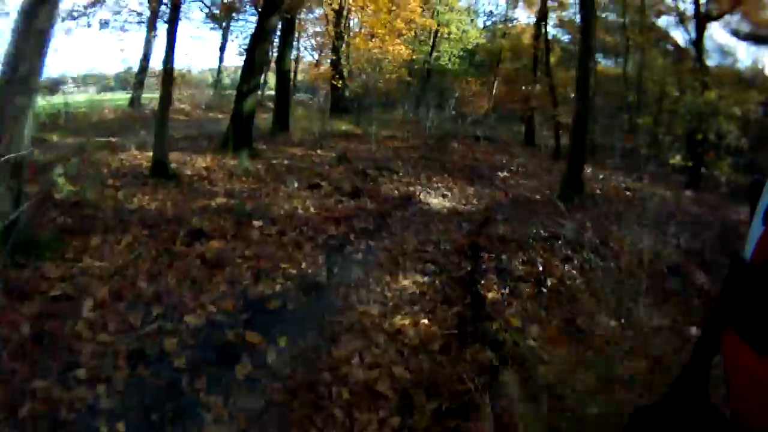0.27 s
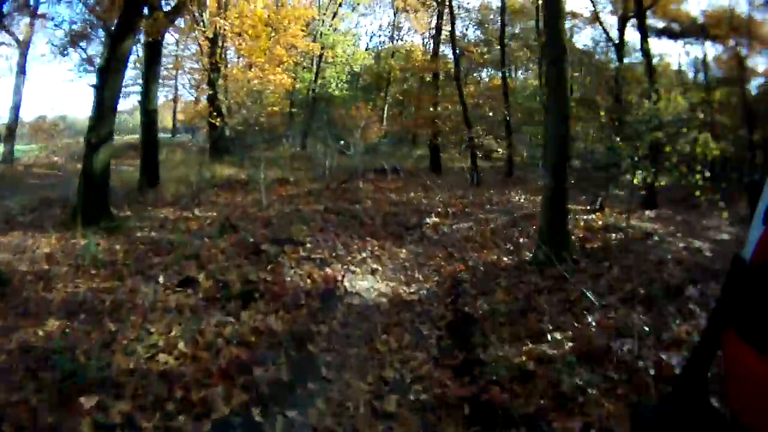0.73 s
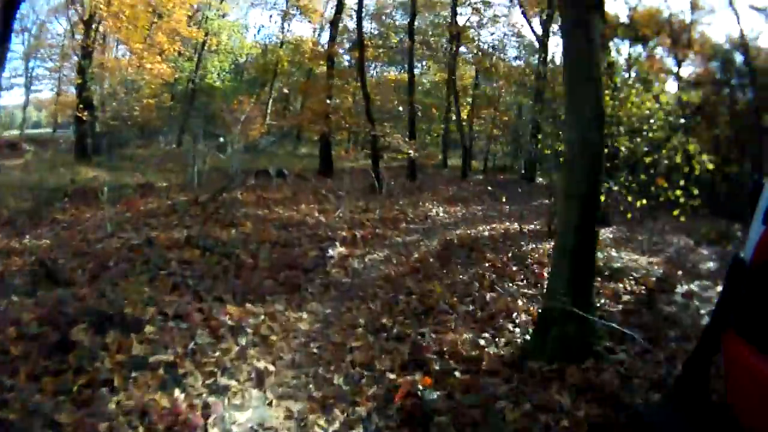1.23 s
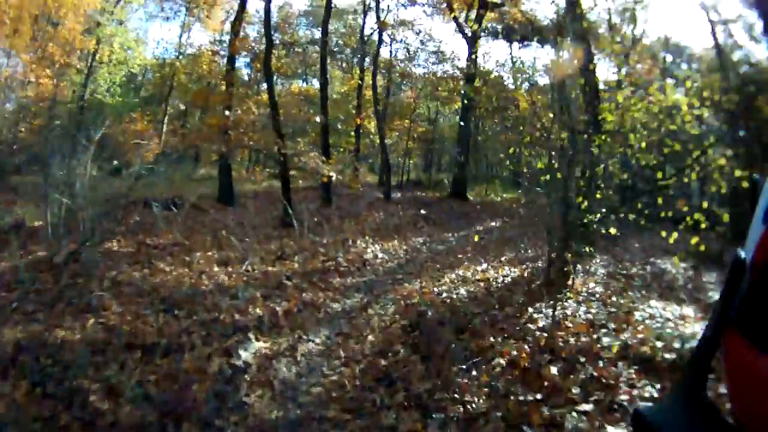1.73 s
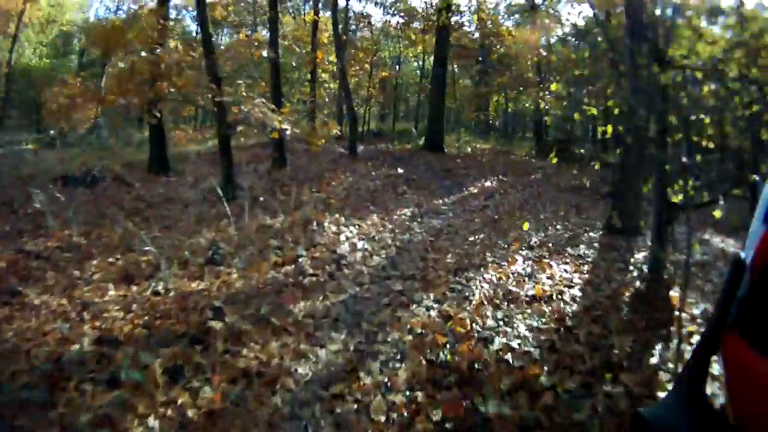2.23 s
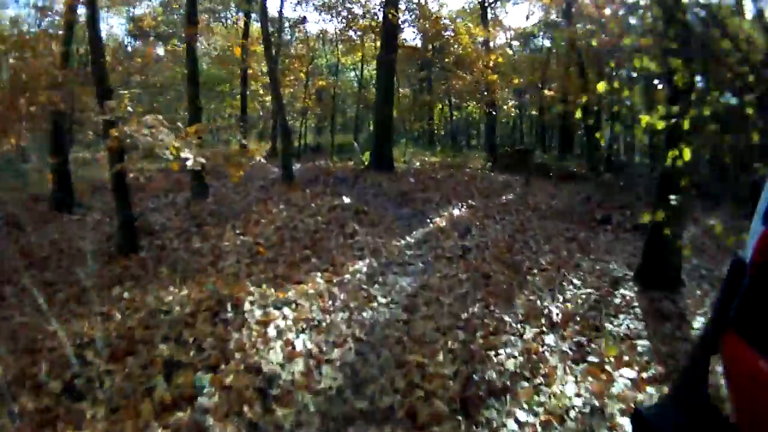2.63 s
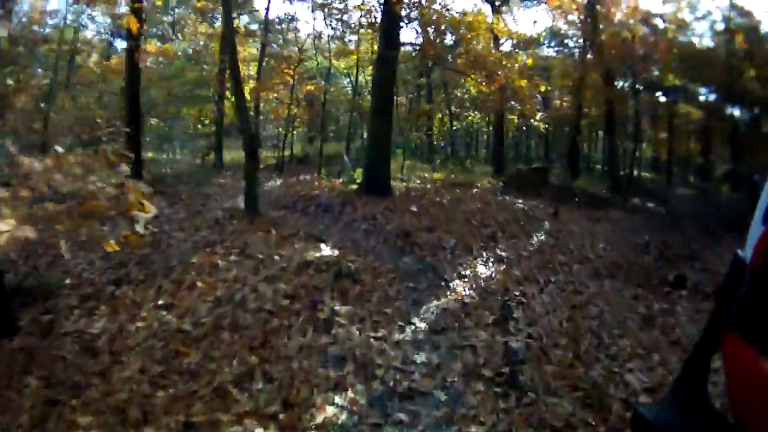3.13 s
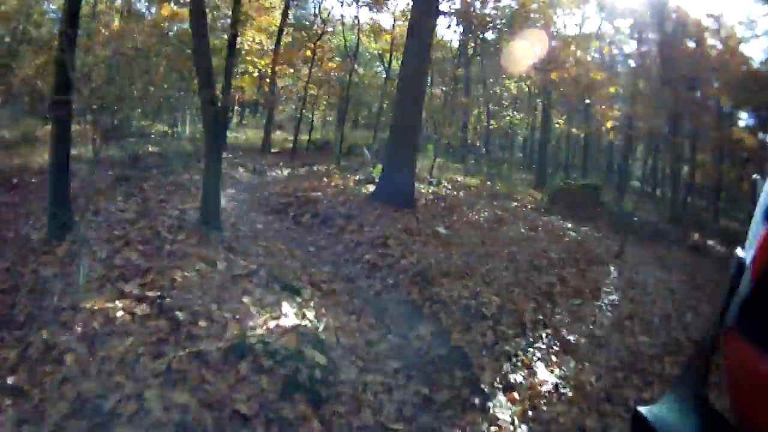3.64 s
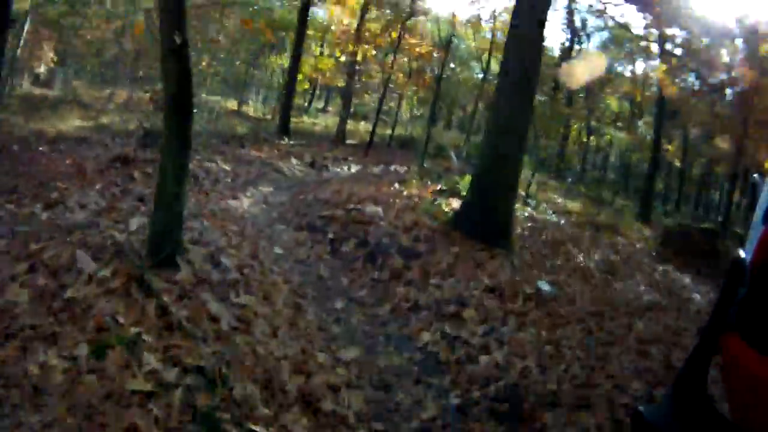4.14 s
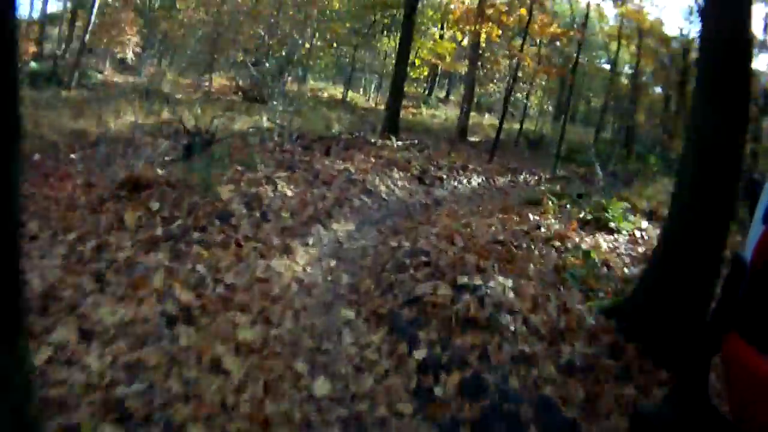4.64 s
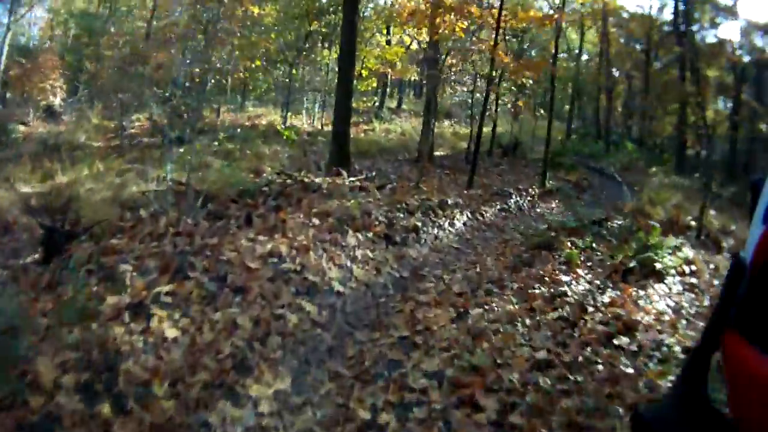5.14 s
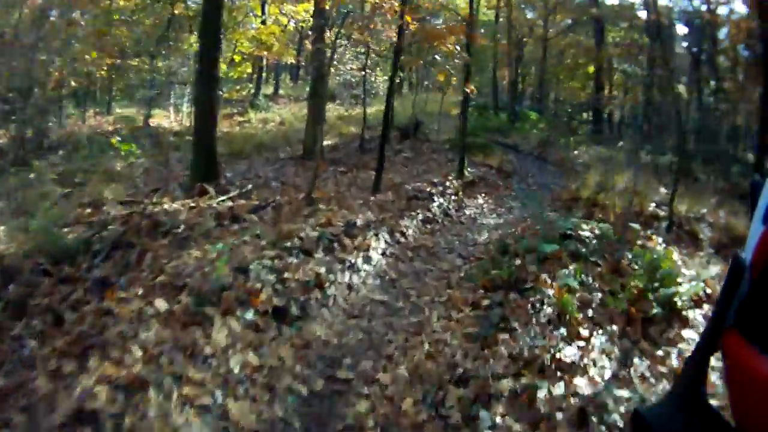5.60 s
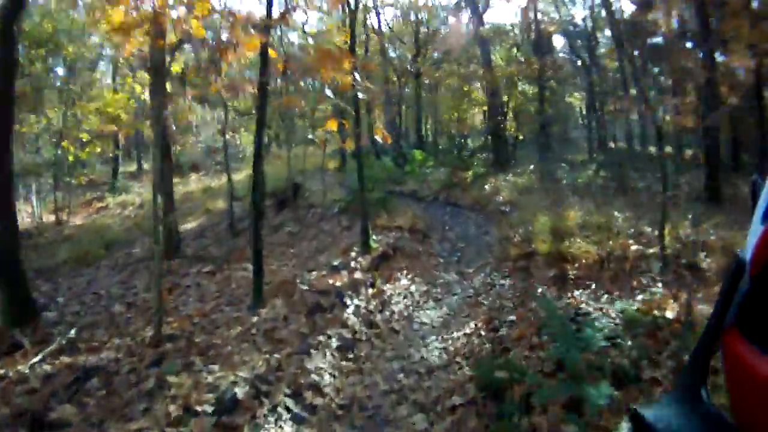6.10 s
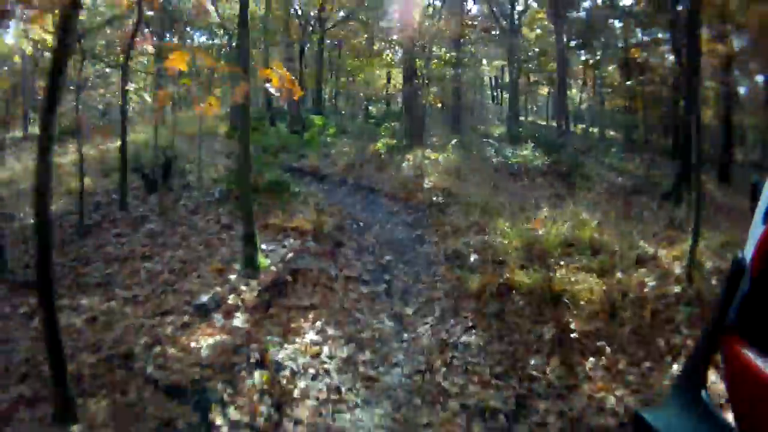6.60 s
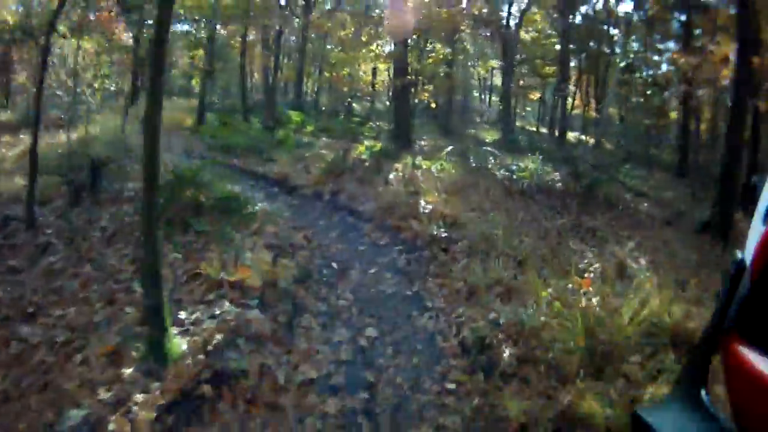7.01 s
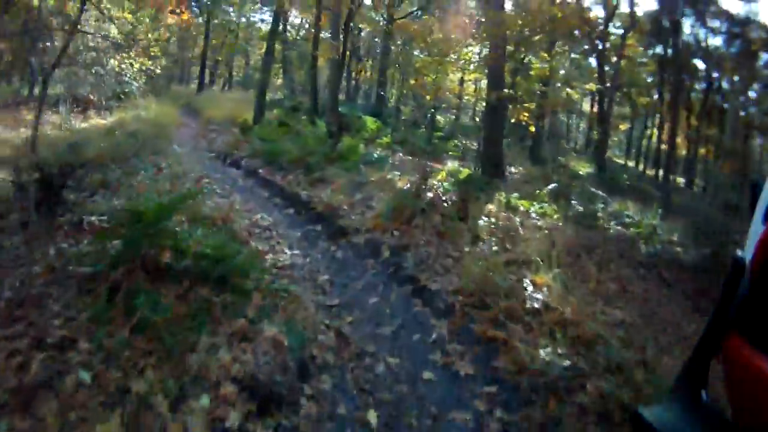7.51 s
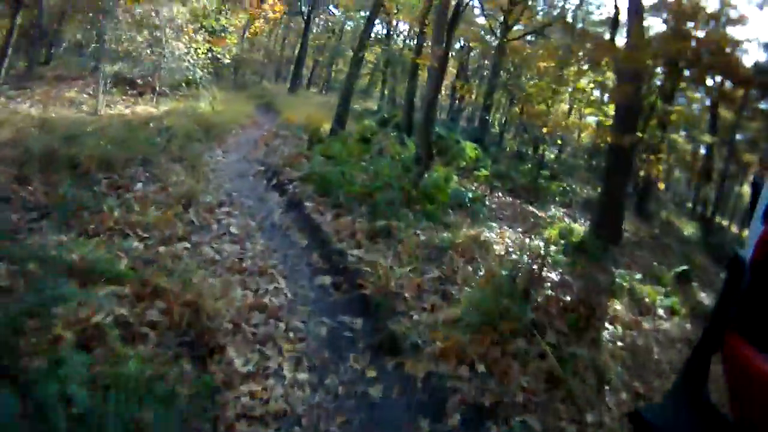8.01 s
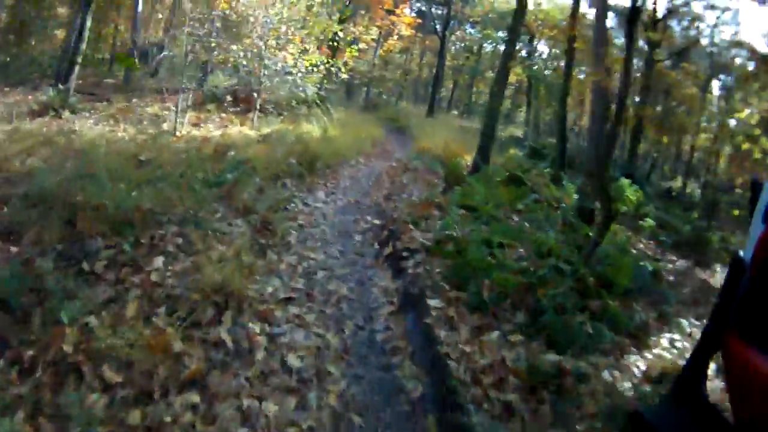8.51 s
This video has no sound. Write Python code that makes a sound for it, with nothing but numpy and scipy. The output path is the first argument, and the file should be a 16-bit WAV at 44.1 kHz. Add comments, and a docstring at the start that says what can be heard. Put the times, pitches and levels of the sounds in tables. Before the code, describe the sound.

For almost nine seconds a bicycle rolls along a leafy woodland trail, heard through a small camera's closed plastic case. A dull, fluttering tyre roar and low gusty wind run throughout, with faint hiss and a barely audible thin whine. At first leaves crackle brightly in quick bursts with tiny grit ticks; a blunt thump comes at about 1.1 s and a deeper one at 1.8 s. From 2.3 to 3.3 s crunching thickens, with several bumps and ticks. Leaf bursts cluster between 3.7 and 4.6 s, with a hard, dry stone knock at 4.2 s. Crisp rustle follows around 5 s. From 6 to 7.2 s the rumble is fuller, the crunch duller, with repeated thumps and a sharp tick at 7.0 s. A second stone knock hits at 7.7 s; leaves thin, bumps continue to 8.3 s, and a bright tick lands at 8.7 s.

```python
"""Bicycle on a leafy trail

A bicycle rolls over dry leaves in a wood, heard from a small camera shut in a plastic case.
Wind and tyre roar are coloured noise, a dull rumble with low thumps from roots and ruts.
Leaves are crowds of tiny random cracks and grit gives single ticks; both ring the plastic case.
Two hard stone knocks ring the lid of the case, and the camera adds its own hiss and a faint whine."""
import sys
import numpy as np
from scipy import signal
from scipy.fft import rfft, irfft, next_fast_len
from scipy.io import wavfile
from scipy.ndimage import map_coordinates

SR = 44100
rng = np.random.default_rng(int(sys.argv[2]) if len(sys.argv) > 2 else 0)


def wav_record(signal):
    """Record a signal, one row per channel, as 16-bit PCM in the file named by sys.argv[1]."""
    frames = np.transpose(np.atleast_2d(signal))
    bounded = np.clip(frames, -1, 1)
    # unit amplitude maps onto the largest positive 16-bit level
    quanta = np.round(bounded * 32767).astype(np.int16)
    wavfile.write(sys.argv[1], SR, quanta)


def boost_factor(decibels):
    """Convert a level in decibels to a linear amplitude factor."""
    exponent = np.asarray(decibels, float) / 20
    return 10 ** exponent


N = 385875  # length in samples


def unit(x):
    """Scale to rms 1."""
    return x / np.sqrt(np.mean(x ** 2) + 1e-20)


def curves(rows):
    """Join the table's points by straight lines: one curve for each column after the time."""
    times, *columns = np.transpose(rows)
    return [np.interp(np.arange(N) / SR, times, column) for column in columns]


def wobble(rate):
    """A smooth random curve around zero, with rate knots a second."""
    knots = rng.standard_normal(N // 100)
    return map_coordinates(knots, [np.arange(N) * rate / SR])


def filtered(x, response):
    """Shape x by a response, possibly complex, given as a function of frequency."""
    size = next_fast_len(len(x) + 8192)  # spare room lets the ringing die away
    hz = np.fft.rfftfreq(size, 1 / SR)
    return irfft(rfft(x, size) * response(hz), size)[:len(x)]


def noise(spectrum):
    """Noise of rms 1, coloured by table points joined on a log frequency axis."""
    f, db = np.transpose(spectrum)
    colour = lambda hz: boost_factor(np.interp(np.log(hz + 1), np.log(f), db))
    return unit(filtered(rng.standard_normal(N), colour))


def mode(hz, centre_hz, width_hz):
    """The causal response of one resonance: strongest at its centre, longer ringing if narrow."""
    return 1j * hz * width_hz / (centre_hz ** 2 - hz ** 2 + 1j * hz * width_hz)


def add_event(out, s, db, sound):
    """Add a short sound at s seconds, scaled so that its peak is db."""
    out[round(s * SR):][:len(sound)] += boost_factor(db) * sound / np.abs(sound).max()


# wind and tyre through the ride: (t/s, wind level/dB, tyre level/dB)
RIDE_LEVELS = [(0.0, -53, -45.5), (0.05, -44, -46), (0.12, -62, -50), (0.15, -49, -46), (0.24, -48, -46.5),
               (0.66, -48.5, -46.5), (0.9, -46.5, -46.5), (1.66, -49, -45.5), (1.8, -44, -44.5),
               (1.83, -49, -42.5), (1.87, -55, -48), (1.92, -51, -46.5), (1.96, -43, -45.5),
               (2.44, -48, -43.5), (2.56, -44.5, -43.5), (2.8, -42, -43.5), (3.24, -45.5, -44.5),
               (3.8, -45.5, -45.5), (4.82, -50.5, -45.5), (4.99, -46.5, -45), (5.17, -54, -48.5),
               (5.19, -45.5, -47), (5.4, -50, -45), (5.68, -48.5, -48), (5.8, -44.5, -43), (6.02, -51, -45),
               (6.11, -46, -43), (6.21, -47, -45.5), (6.33, -46, -42), (6.7, -45.5, -42), (7.09, -45, -43),
               (7.6, -47.5, -47), (7.85, -50, -45.5), (7.92, -43.5, -43.5), (8.04, -50, -48),
               (8.11, -46, -42.5), (8.14, -45, -49), (8.26, -49.5, -45), (8.75, -49.5, -46.5)]
# colour of the wind in the case: (f/Hz, relative level/dB per Hz)
WIND_COLOUR = [(15, -18), (30, -9), (70, -2.5), (150, 0), (250, -4.5), (400, -21.5), (800, -64)]
# colour of the tyre roar: (f/Hz, relative level/dB per Hz)
TYRE_COLOUR = [(100, -17.5), (200, -4.5), (300, -0.5), (520, 0.5), (630, -3), (800, -11), (1000, -19),
               (1500, -26.5), (2200, -32), (5000, -45.5)]


def rumble():
    """Wind buffets the case in gusts; the tyre roar flutters with the uneven ground."""
    gust_db, rut_db, flutter_db = 0.4, 0.35, 1.1  # size of the chance swings
    wind_db, tyre_db = curves(RIDE_LEVELS)
    gusts = boost_factor(gust_db * wobble(6))
    wind = unit(gusts * noise(WIND_COLOUR))
    ground = boost_factor(rut_db * wobble(9) + flutter_db * wobble(70))
    tyre = unit(ground * noise(TYRE_COLOUR))
    return boost_factor(wind_db) * wind + boost_factor(tyre_db) * tyre


# resonances of the plastic case: (f/Hz, width/Hz, relative level/dB)
CASE_MODES = [(1537, 340, -0.5), (2480, 570, -1.5), (3014, 430, -0.5), (3960, 560, -0.5), (4840, 620, -3.5),
              (6490, 1300, -9.5), (9070, 2400, -15.5), (11760, 780, -17.5)]


def case(hz):
    """All resonances of the plastic case together, with alternating signs."""
    return sum((-1) ** k * boost_factor(db) * mode(hz, centre_hz, width_hz)
               for k, (centre_hz, width_hz, db) in enumerate(CASE_MODES))


def cracks(rate, spread_db):
    """Sudden breaks at random moments, about rate a second, of uneven size; rms 1 overall."""
    moment, side, luck = rng.random((3, N))
    breaks = moment < rate / SR
    size = boost_factor(-spread_db * np.log(luck + 0.081))  # a few are much larger
    return unit(breaks * np.sign(side - .5) * size)


# heaps of leaves that burst under the tyre: (t/s of the loudest moment, level/dB)
LEAF_HEAPS = [(0.045, -61), (0.075, -64), (0.2, -61), (0.25, -66), (0.29, -64), (0.33, -57.5), (0.47, -64),
              (0.53, -68), (0.66, -65), (0.88, -67), (1.0, -70), (1.09, -61), (1.19, -63), (1.48, -67),
              (1.62, -65), (2.28, -61), (2.47, -64), (2.55, -65), (2.62, -63), (2.69, -72), (2.86, -59.5),
              (3.06, -63), (3.7, -62.5), (3.91, -59.5), (4.15, -59), (4.22, -61), (4.32, -60.5),
              (4.41, -62.5), (4.59, -58.5), (4.8, -68), (4.89, -64), (5.03, -66), (5.08, -63), (5.5, -69),
              (6.16, -64), (6.95, -57), (7.1, -59), (7.5, -69), (8.13, -63), (8.71, -61.5)]


def heaps():
    """Level of the bursting heaps: each is squeezed, then settles, and their powers add up."""
    rise_s, fall_s = 0.014, 0.019
    peak_s, db = np.transpose(LEAF_HEAPS)
    grid = np.arange(0, N / SR, .002)  # s, coarse steps are enough
    t = grid - peak_s[:, None]
    shape = np.exp(-(t / np.where(t < 0, rise_s, fall_s)) ** 2)
    level = np.sqrt(boost_factor(db) ** 2 @ shape)
    return np.interp(np.arange(N) / SR, t[0] + peak_s[0], level)


# leaf cover: (t/s, crunch level/dB before swings and heaps, dryness 0-1: reach into the treble)
LEAF_COVER = [(0.0, -69, 0.63), (0.45, -65, 0.48), (0.9, -66, 0.44), (1.6, -65, 0.36), (1.85, -63, .4),
              (2.1, -63, .4), (2.3, -64.5, 0.36), (2.7, -60, 0.47), (3.0, -66.5, 0.24), (3.3, -60, 0.58),
              (3.6, -67, 0.56), (4.0, -63, 0.52), (4.5, -63.5, 0.42), (5.05, -63.5, 0.66),
              (5.2, -65.5, 0.6), (5.35, -65, 0.74), (5.55, -63, 0.5), (5.8, -67, 0.2), (6.1, -61, 0.33),
              (6.5, -60, 0.2), (6.65, -62, 0.15), (7.3, -63.5, 0.46), (7.65, -68.5, 0.44), (8.2, -67.5, .6),
              (8.75, -71.5, 0.64)]
# crispness of the crunch: (t/s, level/dB added to the middle of its upper middle band)
CRISPNESS = [(0, 1), (.8, -1), (1.6, 1.5), (2.2, 1), (2.6, 4.5), (3.1, -0.5), (3.8, 0), (4.5, 1),
             (5.05, 4.5), (5.6, -0.5), (6.2, -0.5), (7, -3), (7.8, -3), (8.75, -1)]


def leaves():
    """Dense leaf cracks in clumps over a finer rustle; many a crack stirs one case resonance."""
    uneven_db = 0.94  # chance swings of leaf cover
    crisp_hz, crisp_width_hz = 4260, 1100
    crunch_db, dryness = curves(LEAF_COVER)
    crisp_db = curves(CRISPNESS)[0]
    clumps = boost_factor(1.48 * wobble(40) + 1.5 * wobble(150))
    rustle = rng.standard_normal(N)
    shared = clumps * (.42 * cracks(1500, spread_db=4) + .55 * rustle)
    crunch = filtered(shared, case)

    # cracks that stir one resonance alone, in swells of its own
    for centre_hz, width_hz, db in CASE_MODES:
        swells = clumps * boost_factor(1.1 * wobble(10))
        own = swells * cracks(260, spread_db=3.0)
        # 1.47 makes it wider, as the square makes it narrower
        ringing = filtered(own, lambda hz: mode(hz, centre_hz, 1.47 * width_hz) ** 2)
        crunch += boost_factor(db - 1.7) * ringing
    crunch = unit(crunch)

    crisp_band = filtered(crunch, lambda hz: np.abs(mode(hz, crisp_hz, crisp_width_hz)) ** 2)
    crunch += (boost_factor(crisp_db) - 1) * crisp_band
    # dry leaves gain treble (above about 5600 Hz), damp ones lose it
    top = filtered(crunch, lambda hz: 1 / (1 + (5600 / (hz + 1)) ** 8))
    level = np.hypot(boost_factor(crunch_db + uneven_db * wobble(14)), heaps())
    return level * (crunch + (2 * np.clip(dryness, 0, 1) - 1) * top)


# colour of the microphone amplifier's hiss: (f/Hz, relative level/dB per Hz)
HISS_COLOUR = [(2000, -2), (4000, 2), (6000, -5), (10000, -8), (12200, -10), (13500, -4), (15500, -42),
               (17000, -60)]
# whine of the camera electronics: (f/Hz, rms level/dB)
WHINE_TONES = [(5545, -89), (11090, -97)]


def camera():
    """Almost steady hiss of the microphone amplifier and a thin whine of wavering sines."""
    t = np.arange(N) / SR
    # + 3 dB turns the rms of a sine into its peak
    whine = sum(boost_factor(db + 3) * np.sin(2 * np.pi * hz * t + .8 * wobble(2)) for hz, db in WHINE_TONES)
    hiss = boost_factor(-69.0) * boost_factor(0.4 * wobble(14.0)) * noise(HISS_COLOUR)
    return hiss + whine


# clear grit and twig ticks: (t/s, peak level/dB, centre f/Hz, width as a share of f before squaring)
GRIT_TICKS = [(0.0255, -45.5, 5500, 0.56), (0.0655, -42, 4410, 0.83), (0.1795, -53, 3750, .8),
              (0.6632, -43, 3720, 1), (0.7337, -55, 3500, .8), (0.9836, -43.5, 3800, 1),
              (1.1263, -53, 2800, .2), (1.1812, -46, 3400, .8), (1.4586, -54, 3700, .6),
              (1.5933, -55, 3850, .6), (1.732, -50, 3250, 0.37), (2.258, -45, 3240, 0.4),
              (2.2838, -46, 4210, 1), (2.3381, -49, 3400, .5), (2.4608, -52, 3020, .3),
              (2.614, -46, 3080, 0.45), (2.6384, -45, 4500, .25), (2.7242, -48, 3900, .4),
              (2.752, -46, 4500, .4), (2.834, -46, 3300, .4), (2.858, -46, 3260, 0.4),
              (3.062, -41.5, 3400, 0.29), (3.1004, -50, 3600, .9), (3.1617, -53, 3100, .3),
              (3.28, -46, 3130, 0.24), (3.739, -42, 3620, 1), (3.8162, -48, 2500, .4),
              (4.1435, -49, 2900, .5), (4.171, -47, 5460, 0.43), (4.2176, -45, 2950, 0.19),
              (4.3027, -49, 6490, 0.18), (4.6789, -48, 4690, 0.31), (4.743, -47, 6070, 0.2),
              (4.9357, -53, 3870, .4), (4.9806, -46, 3900, .2), (4.9877, -44, 6400, 0.14),
              (5.031, -46, 4000, 0.53), (5.3887, -48, 3200, 0.62), (5.8722, -47, 3360, 0.38),
              (6.0642, -47, 5660, 0.4), (6.137, -49, 2600, 0.58), (6.7327, -46.5, 6030, 0.14),
              (6.893, -46, 3260, 0.7), (7.04, -37.5, 4140, 0.49), (7.0609, -48, 3850, .6),
              (7.2883, -50, 3200, .5), (7.2995, -51, 3100, .2), (7.309, -50, 3200, .3),
              (7.484, -47, 4200, .9), (7.87, -47.5, 3970, 0.43), (7.946, -46, 3450, 0.4),
              (8.0228, -52, 6340, 0.17), (8.317, -52, 6330, 0.17), (8.4107, -47, 3370, 0.56),
              (8.7217, -36.5, 6430, 0.14)]


def ticks():
    """Each piece of grit gives a sharp blow and a short scrape around its own pitch, ringing the case."""
    out = np.zeros(N + SR)
    t = np.arange(2048) / SR
    scrapes = rng.standard_normal((len(GRIT_TICKS), len(t)))
    for (s, db, centre_hz, width), scrape in zip(GRIT_TICKS, scrapes):
        width_hz = centre_hz * max(width, .05)
        # the scrape swells within about a millisecond under a fade of 60 dB in 10 ms
        blow = 0.11 * scrape * (1 - np.exp(-t / 0.00075)) * boost_factor(-60 * t / 0.01)
        blow[8] += 1  # the sharp blow itself
        tick = filtered(blow, lambda hz: case(hz) * mode(hz, centre_hz, width_hz) ** 2)
        add_event(out, s, db, tick)
    return out[:N]


# roots and ruts under the tyre: (t/s, peak level/dB, thump f/Hz)
ROOTS_AND_RUTS = [(1.0606, -33.5, 400), (1.309, -43, 450), (1.817, -31.5, 290), (2.381, -35, 500),
                  (2.624, -34, 250), (2.739, -34, 564), (4.824, -37, 536), (4.974, -40.5, 460),
                  (6.423, -36.5, 510), (6.538, -34, 460), (6.626, -36, 540), (7.064, -34, 455),
                  (7.101, -42, 297), (7.193, -39, 530), (7.7, -38, 570), (8.074, -35.5, 364),
                  (8.316, -37, 620)]


def bumps():
    """Each bump is one blunt push that rings two modes of the frame, dying away within moments."""
    edge, edge_ratio = 0.29, 2.18  # the second mode: strength and pitch over the thump
    out = np.zeros(N + SR)
    t = np.arange(2048) / SR
    for s, db, thump_hz in ROOTS_AND_RUTS:
        # decays: 60 dB in 36 ms for the thump, in 7.1 ms for the second mode
        thump = (1 - np.exp(-t / 0.00041)) * boost_factor(-60 * t / 0.036) * np.sin(2 * np.pi * thump_hz * t)
        thump += edge * boost_factor(-60 * t / 0.0071) * np.sin(2 * np.pi * edge_ratio * thump_hz * t)
        add_event(out, s, db, thump)
    return out[:N]


# parts of two hard stone knocks on the case, each row one share of a knock's sound:
# (t/s, peak level/dB, mix of lid modes 0-1, bright edge level/dB before peak scaling)
KNOCK_PARTS = [(4.2249, -47, 0.2, -9), (4.2271, -35, 0.04, -18), (4.2271, -37, 0.28, -24),
               (4.2305, -41, 0.16, -10), (4.2415, -53, .2, -8), (7.7243, -35, 0.25, -25),
               (7.7267, -40, .33, -21)]
# modes of the lid under a hard knock: (f/Hz, relative level/dB, t60/s of one pass through the mode)
LID_MODES = [(1590, 7.5, 0.0044), (2930, 9, 0.0047), (4100, 3, 0.0045), (5150, 6.5, 0.0034),
             (6090, 2, 0.0043)]


def stone_knocks():
    """Two hard knocks, each a sum of closely spaced parts that mix the lid's modes differently."""
    crack_hz, crack_width_hz = 11400, 4100  # broad bright edge of each part
    out = np.zeros(N + SR)
    blow = np.eye(1, 2048)[0]  # a single click
    for s, db, mix, edge_db in KNOCK_PARTS:
        def response(hz):
            total = boost_factor(edge_db) * mode(hz, crack_hz, crack_width_hz)
            for k, (centre_hz, level_db, t60) in enumerate(LID_MODES, start=1):
                width_hz = np.log(1000) / np.pi / t60
                share = np.sin(np.pi * k * mix)  # how strongly this mode sounds, and its sign
                # two passes through the mode (the square) ring longer than one
                total = total + share * boost_factor(level_db) * mode(hz, centre_hz, width_hz) ** 2
            return total
        add_event(out, s, db, filtered(blow, response))
    return out[:N]


def scene():
    """Everything reaches one microphone."""
    return (rumble() + leaves() + camera() + ticks() + bumps() + stone_knocks())[None]


def low_pass(x):
    """Removes everything above the highest recorded frequency."""
    return signal.sosfilt(signal.butter(12, 15000, fs=SR, output="sos"), x)


def record(dry):
    """Store the finished mix."""
    return low_pass(dry)


dry = scene()
out = record(dry)
wav_record(out)
```